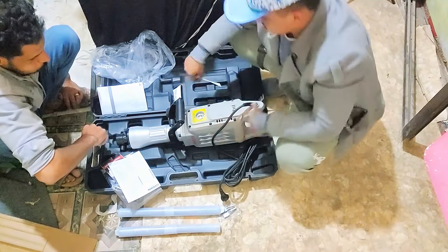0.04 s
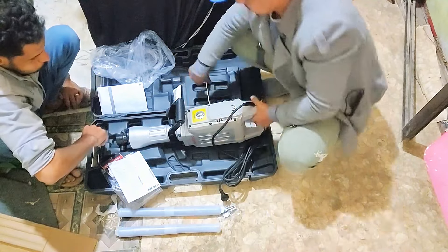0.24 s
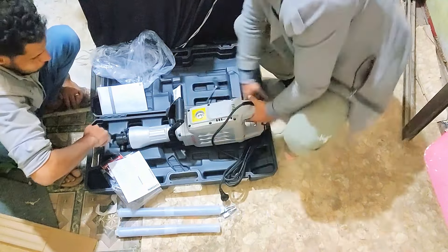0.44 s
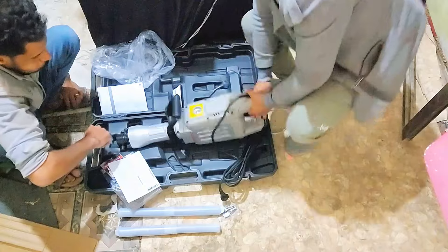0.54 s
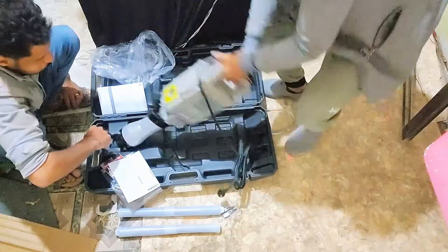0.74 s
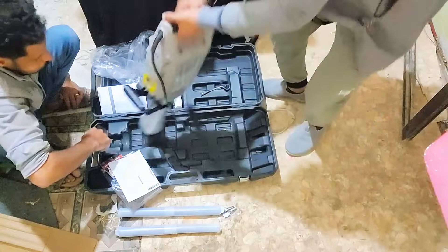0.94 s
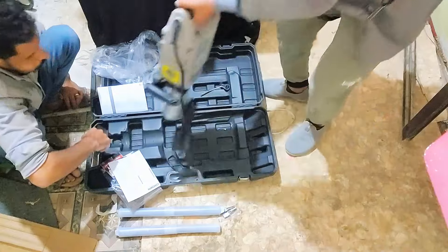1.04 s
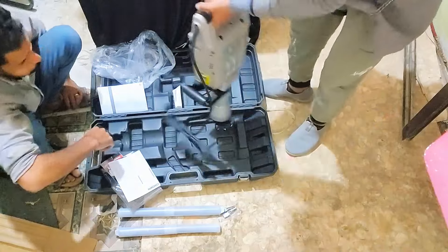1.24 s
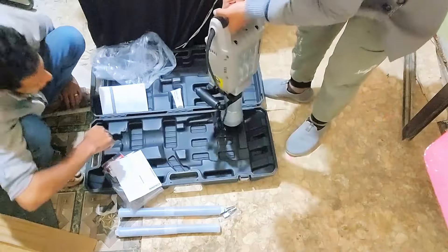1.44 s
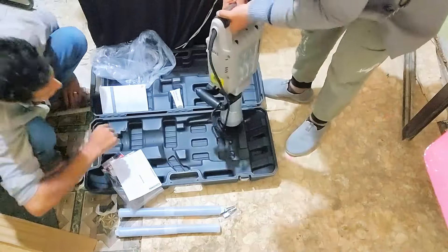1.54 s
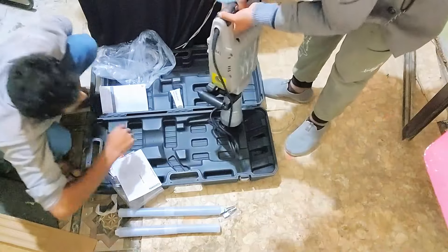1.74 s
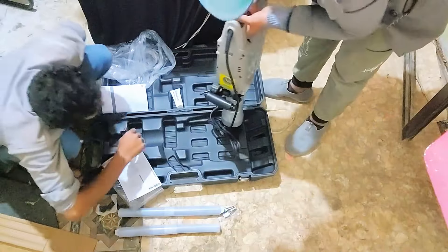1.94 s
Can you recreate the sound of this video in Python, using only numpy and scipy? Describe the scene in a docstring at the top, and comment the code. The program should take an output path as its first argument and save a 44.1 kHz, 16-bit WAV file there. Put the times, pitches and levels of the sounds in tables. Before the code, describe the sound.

A heavy tool knocks and scrapes in a hard plastic case. Hollow knocks come at about 0.25 seconds, followed by dragging, small clacks and faint squeaks until 0.8. A strong thump with a bright steel clink lands at 0.9, and another bump just after. At 1.35 the tool is set down with a sharp clack, rattling and scraping until about 1.6. A small room echoes briefly over a faint rumble.

```python
"""A faint hiss, then thumps, clacks and scrapes of a moulded plastic case: a heavy demolition hammer is
dragged out of it, lifted, and stood back on its nose in it. Blows ring the panels and shell; sliding is a
stream of tiny slips with stick-slip squeaks. Hard edges snap past each other; loose steel on the tool
clinks and rattles. A small hard room answers, over a low rumble."""
import sys
import numpy as np
from scipy import signal
from scipy.fft import rfft, irfft, next_fast_len
from scipy.io import wavfile

SR = 44100
rng = np.random.default_rng(int(sys.argv[2]) if len(sys.argv) > 2 else 0)


def master_out(mix):
    """Clip the mix to full scale and print it as 16-bit PCM to the path in sys.argv[1]."""
    frames = np.transpose(np.atleast_2d(mix))
    ceiling = np.clip(frames, -1, 1)
    pcm = np.round(ceiling * 32767).astype(np.int16)
    wavfile.write(sys.argv[1], SR, pcm)


N = 88200
T = np.arange(18000) / SR  # time within one event, s
MID_SIDE = np.array([[1], [.65]])  # gains
CRACK_RISE_S = .0007


def amp(db):
    """Decibels to gain."""
    return 10 ** (np.asarray(db) / 20)


def unit(x):
    """Scales to rms 1."""
    return x / np.sqrt(np.mean(x ** 2) + 1e-20)


def read(points, hz):
    """Interpolates a table on a log-frequency axis."""
    f, value = np.transpose(points)
    return np.interp(np.log(hz + 1), np.log(f), value)


def colour(x, points):
    """Filters by rows of Hz, gain in dB."""
    n = x.shape[-1]
    size = next_fast_len(n + 2048)
    gain = amp(read(points, np.fft.rfftfreq(size, 1 / SR)))
    return irfft(rfft(x, size) * gain, size)[..., :n]


def add(mix, start_s, sound):
    """Mixes a sound in at start_s."""
    part = mix[..., max(round(start_s * SR), 0):][..., :sound.shape[-1]]
    part += sound[..., :part.shape[-1]]


def strike(rise_s, t60_s, hold_s=0):
    """Envelope of a blow, peak 1; the decay begins after hold_s."""
    envelope = (1 - np.exp(-T / max(rise_s, 1e-5))) * amp(-60 * np.maximum(T - hold_s, 0) / t60_s)
    return envelope / envelope.max()


def sine(hz):
    """Sine of rms 1."""
    return np.sqrt(2) * np.sin(2 * np.pi * hz * T)


def dense_modes(spectrum):
    """Countless close modes as coloured noise; mid and side."""
    return unit(colour(rng.standard_normal((2, len(T))), spectrum)) * MID_SIDE


def flutter(hz):
    """Complex random wavering, low-passed at hz, rms 1; mid and side."""
    z = rng.standard_normal((2, len(T))) + 1j * rng.standard_normal((2, len(T)))
    z = np.fft.ifft(np.fft.fft(z) / (1 + (np.fft.fftfreq(len(T), 1 / SR) / hz) ** 2))
    return z / np.sqrt(np.mean(abs(z) ** 2))


# Rumble spectrum. Each row: frequency in Hz, gain in dB.
RUMBLE_SPECTRUM = [(15, -7.5), (38, -0.5), (65, -12), (105, -7), (170, -19), (350, -24), (700, -35),
                   (2000, -49), (7000, -51), (9000, -58), (16000, -63)]


def rumble():
    """Steady low noise of the room."""
    return amp(-58.5) * unit(colour(rng.standard_normal((2, N)), RUMBLE_SPECTRUM))


# Room decay. Each row: frequency in Hz, t60 in seconds.
ROOM_DECAY = [(80, 0.29), (250, 0.39), (700, 0.41), (2000, 0.34), (5000, 0.19), (15000, 0.27)]
# Echo spectrum. Each row: frequency in Hz, gain in dB.
ECHO_SPECTRUM = [(80, -9.5), (250, -14), (600, -9), (2000, -11.5), (5000, -11), (15000, -8.5)]


def room_echo(source, early_db=7):
    """Quick echoes from floor and furniture, then a short diffuse tail."""
    taps = rng.standard_normal((2, SR)) * (rng.random((2, SR)) < 3000 / SR)
    taps *= np.arange(SR) > .004 * SR
    hz, t, bands = signal.stft(taps, SR, nperseg=256)
    t60_s = read(ROOM_DECAY, hz)[:, None]
    decaying = bands * amp(-60 * t / t60_s) / np.sqrt(t60_s)
    tail = signal.istft(decaying, SR, nperseg=256)[1][:, :len(T)]
    early = rng.standard_normal((2, len(T))) * (rng.random((2, len(T))) < 900 / SR)
    early *= strike(rise_s=.001, t60_s=.082)
    response = tail / np.linalg.norm(tail[0]) + amp(early_db) * early / np.linalg.norm(early[0])
    return signal.fftconvolve(source[:1], colour(response, ECHO_SPECTRUM), axes=1)[:, :N]


# Steel clinks. Each row: start in seconds, ring in dB, jingle in dB, rise and chatter in seconds.
STEEL_CLINKS = [(.817, -56, -67, .012, .03), (.910, -29, -42.5, .006, .022), (.96, -52, -50, .004, .005),
                (1.036, -51, -55, .005, .04), (1.353, -49, -49, .004, .015), (1.372, -43, -50, .005, .028),
                (1.42, -54, -55, .005, .04), (1.475, -45, -53, .008, .033)]
# Steel modes. Each row: frequency in Hz, dB with the tool hanging, dB with it standing, t60 in seconds.
STEEL_MODES = [(5280, -30, -12, .11), (5852, -1, 1, .085), (6250, -24, -9, .1), (7502, 1, 0, .07),
               (9212, -15, -19, .13), (9360, -23, -14, .1), (10510, -22, -18, .12), (12030, -29, -12, .11),
               (12480, -23, -22, .11), (14384, -10, -15, .16), (14950, -15, -13, .12),
               (15410, -21, -10, .12)]
# Jingle spectrum. Each row: frequency in Hz, gain in dB.
JINGLE_SPECTRUM = [(2500, -25), (4500, 0), (6000, -3), (6800, -12), (7600, -2), (9400, -7), (10000, -17),
                   (11000, -6), (15000, -5)]


def steel_clinks(stands_at_s=1.343, rattle_depth=.5, rattle_hz=70):
    """Loose steel chatters into a high ring; standing the tool up shifts the balance of its modes."""
    out = np.zeros((2, N))
    for start_s, ring_db, jingle_db, rise_s, chatter_s in STEEL_CLINKS:
        clink = amp(jingle_db) * dense_modes(JINGLE_SPECTRUM)
        clink *= strike(rise_s, t60_s=.09, hold_s=chatter_s)
        for hz, hanging_db, standing_db, t60_s in STEEL_MODES:
            rattle = 1 + rattle_depth * flutter(rattle_hz)
            tone = (rattle * np.exp(2j * np.pi * (hz * T + rng.random((2, 1))))).real
            db = ring_db + (hanging_db if start_s < stands_at_s else standing_db)
            clink += amp(db) * tone * strike(rise_s, t60_s, chatter_s) * MID_SIDE
        add(out, start_s, clink)
    return out


# Squeaks. Each row: start and length in seconds, pitch and bandwidth in Hz, level in dB.
SLIP_SQUEAKS = [(0.243, 0.06, 4405, 593, -50), (0.279, 0.04, 2134, 400, -37.5),
                (0.34, 0.047, 3110, 120, -55.5), (0.342, 0.048, 3930, 700, -57.5),
                (0.44, 0.061, 2278, 302, -47.5), (0.502, 0.026, 3165, 305, -55.5),
                (0.611, 0.04, 7190, 740, -50), (1.357, 0.18, 4670, 60, -51.5)]


def slip_squeaks():
    """Sliding parts stick and slip, singing briefly at one unsteady pitch."""
    out = np.zeros((2, N))
    for start_s, length_s, hz, width_hz, db in SLIP_SQUEAKS:
        tone = unit((flutter(width_hz / 2) * np.exp(2j * np.pi * hz * T)).real)
        swell = np.sin(np.pi * np.minimum(T / length_s, 1))
        add(out, start_s, amp(db) * tone * swell * MID_SIDE)
    return out


# Snaps. Each row: start in seconds, level in dB, pitch in Hz, t60 in seconds.
EDGE_SNAPS = [(.074, -55, 7500, .004), (.443, -45, 5100, .008), (.550, -54, 7000, .005),
              (.7195, -34, 2400, .013), (.720, -37, 3420, .009), (.738, -42, 2250, .018),
              (1.033, -33, 3130, .025), (1.3435, -22, 2150, .014), (1.344, -29, 2850, .011)]


def edge_snaps(roughness=.9):
    """A hard edge lets go and rings for an instant at one rough pitch."""
    out = np.zeros((2, N))
    mid_only = np.array([[1], [0]])
    for start_s, db, hz, t60_s in EDGE_SNAPS:
        tone = ((mid_only + roughness * flutter(hz=800)) * np.exp(2j * np.pi * hz * T)).real
        add(out, start_s, amp(db) * tone * strike(CRACK_RISE_S, t60_s))
    return out


# Low, middle and high spectra; knocks share clack and crack. Each row: frequency in Hz, gain in dB.
GROAN_SPECTRUM = [(60, -24.5), (120, -7.5), (220, -2.5), (340, -8), (500, -20), (700, -16.5), (2000, -67.5)]
CLACK_SPECTRUM = [(150, -28), (400, 3.5), (650, -5.5), (900, -5.5), (1300, -4), (2200, -16), (3000, -26.5),
                  (5000, -39.5), (9000, -59.5)]
CRACK_SPECTRUM = [(800, -23), (1800, -4.5), (2500, -7), (3200, -2.5), (4200, -9), (6000, -10.5),
                  (8000, -15.5), (11000, -27.5), (15500, -32)]
# First row is faint background hiss and low noise; the rest are the tool sliding on plastic.
# Each row: start and length in seconds, groan, clack and crack in dB.
HISS_AND_SCRAPES = [(.0, 0.33, -65.5, -91, -71), (0.245, 0.14, -33, -37, -57),
                    (0.316, 0.25, -41, -66.5, -65.5), (0.439, 0.076, -36.5, -45.5, -62),
                    (0.484, 0.16, -46.5, -59, -61.5), (0.598, 0.027, -41, -39, -49),
                    (0.623, 0.063, -47, -47, -61), (0.689, 0.13, -46, -76.5, -63.5),
                    (0.888, 0.11, -34.5, -51, -41.5), (0.922, 0.057, -41.5, -37, -45),
                    (0.986, 0.19, -48, -52, -55.5), (1.046, 0.049, -30, -59.5, -81),
                    (1.186, 0.51, -51, -62, -67), (1.353, 0.14, -27, -44.5, -49.5),
                    (1.461, 0.16, -35.5, -47, -75)]


def hiss_and_scrapes(clicks_per_s=2600, spread_db=3):
    """Swells of dense clicks: faint background noise first, then the tool's tiny slips on the plastic."""
    out = np.zeros((2, N))
    spectra = GROAN_SPECTRUM, CLACK_SPECTRUM, CRACK_SPECTRUM
    for start_s, length_s, *levels_db in HISS_AND_SCRAPES:
        onsets = rng.random(len(T)) < clicks_per_s / SR
        strength = amp(spread_db * np.minimum(rng.exponential(1, len(T)), 3))
        clicks = onsets * strength * rng.choice([-1., 1.], (2, len(T)))
        noise = sum(amp(db) * unit(colour(clicks, spectrum)) for db, spectrum in zip(levels_db, spectra))
        swell = np.sin(np.pi * np.minimum(T / length_s, 1) ** .55)  # peaks early
        add(out, start_s, noise * swell * MID_SIDE)
    return out


# Case modes. Each row: frequency in Hz, level in dB, t60 in seconds.
CASE_MODES = [(102.3, -17.5, 0.4), (163, -16, 0.15), (188.1, -14, .22), (237.2, -13.5, 0.29),
              (303.5, -15.5, 0.13), (356.5, -13, 0.046), (420.3, -17, 0.085), (478.6, -18.5, 0.15),
              (680, -26, 0.12), (880, -24.5, 0.17)]
# Case radiation, weak in the deep bass. Each row: frequency in Hz, gain in dB.
CASE_RADIATION = [(40, -24.5), (80, -4), (115, 1), (16000, -5.5)]
# Tool against case. Each row: start in seconds, thump in dB and Hz, panel in dB and Hz,
# panel t60 in seconds, clack in dB and Hz, crack in dB.
CASE_KNOCKS = [(.230, -33, 145.6, -23, 319.4, 0.066, -30.5, 1686, -47.5),
               (.256, -40, 110, -20.5, 326.6, 0.14, -39.5, 1540, -41.5),
               (.276, -24, 193, -13.5, 317, 0.056, -35.5, 1550, -41),
               (0.298, -40.5, 113.5, -33.5, 274.5, .15, -41, 2050, -54),
               (.428, -41, 147.7, -25, 367, 0.116, -37, 1594, -44.5),
               (.442, -52, 241, -23.5, 360, 0.1, -34, 1630, -50.5),
               (.524, -33.5, 103.6, -50.5, 338.6, 0.081, -65, 1380, -67.5),
               (.613, -43, 130.2, -20, 252, .04, -27.5, 1460, -49),
               (.617, -41.5, 144.6, -20, 340, 0.028, -28, 1458, -44),
               (.720, -36.5, 194.3, -26, 346.6, .05, -38, 1630, -54),
               (.742, -36, 153, -27.5, 361.3, 0.087, -44.5, 2170, -59),
               (0.812, -53.5, 171, -31.5, 492, 0.034, -50.5, 1940, -46),
               (0.838, -46, 172, -28, 471, 0.02, -47, 1026, -47),
               (.910, -21, 177, -18.5, 477, 0.025, -30, 2324, -24),
               (.916, -17.5, 166.9, -22.5, 520, 0.063, -33.5, 1360, -49),
               (.952, -25, 188, -24.5, 446.3, 0.055, -37, 950, -48.5),
               (1.031, -36, 177.2, -29.5, 400.5, 0.025, -35.5, 1590, -33),
               (1.038, -22, 172.7, -23, 334, 0.019, -26, 825, -40.5),
               (1.343, -34.5, 202, -12.5, 342, 0.026, -17.5, 1177, -49),
               (1.352, -36.5, 139, -17.5, 238, 0.052, -32, 1087, -35.5),
               (1.377, -28, 180, -23.5, 264.5, 0.074, -39.5, 844, -54),
               (1.399, -35.5, 105.4, -37, 235, 0.072, -42.5, 824, -56),
               (1.426, -56.5, 183.5, -26.5, 416.3, 0.068, -36.5, 771, -61.5),
               (1.477, -48.5, 167, -40, 351, 0.077, -42, 877, -41.5),
               (1.517, -54.5, 177, -30.5, 367, 0.034, -43, 860, -50),
               (1.541, -38.5, 223.7, -28, 367.3, 0.049, -51.5, 715, -68)]


def case_knocks(thump_rise_s=.018, panel_rise_s=.003, shell_db=-3, ring_db=-7.5):
    """Each blow thumps the hollow case, bends one panel, and sets the shell clacking and ringing."""
    out = np.zeros((2, N))
    ring = sum(amp(db) * sine(hz) * strike(panel_rise_s, t60_s) for hz, db, t60_s in CASE_MODES)
    chatter = amp(-11) * strike(thump_rise_s, t60_s=.06)  # the shell buzzes on after a blow
    clack_envelope = strike(rise_s=.001, t60_s=.05) + chatter
    crack_envelope = strike(CRACK_RISE_S, t60_s=.024) + chatter
    for (start_s, thump_db, thump_hz, panel_db, panel_hz, panel_t60_s,
         clack_db, clack_hz, crack_db) in CASE_KNOCKS:
        blow = amp(clack_db + shell_db) * dense_modes(CLACK_SPECTRUM) * clack_envelope
        blow += amp(crack_db) * dense_modes(CRACK_SPECTRUM) * crack_envelope
        struck_spot = amp(clack_db) * sine(clack_hz) * strike(CRACK_RISE_S, t60_s=.022)
        thump = amp(thump_db) * sine(thump_hz) * strike(thump_rise_s, t60_s=.047)
        panel = sine(panel_hz) * strike(panel_rise_s, panel_t60_s)
        blow[0] += struck_spot + thump + amp(panel_db) * (panel + amp(ring_db) * ring)
        add(out, start_s, blow)
    return colour(out, CASE_RADIATION)


# Stereo width. Each row: frequency in Hz, linear side gain.
SIDE_GAIN = [(60, .22), (200, .21), (380, .33), (600, 1.15), (2000, .95), (5000, .65), (15000, .8)]
# Stereo balance. Each row: frequency in Hz, left over right in dB.
BALANCE = [(60, 0), (170, .1), (380, 2.4), (700, 1.4), (1290, .7), (2380, -1.9), (4400, -2), (8000, .3),
           (15000, 0)]


def scene():
    """Opening hiss, handling noise and their echo over the rumble; left and right, bass near mono."""
    direct = case_knocks() + hiss_and_scrapes() + slip_squeaks() + edge_snaps() + steel_clinks()
    direct *= amp(-2.5)
    mid, side = rfft(rumble() + room_echo(direct) + direct)
    hz = np.fft.rfftfreq(N, 1 / SR)
    side *= read(SIDE_GAIN, hz)
    lean = amp(read(BALANCE, hz) / 2)
    return irfft(np.array([(mid + side) * lean, (mid - side) / lean]), N)


# Treble notch. Each row: frequency in Hz, gain in dB.
TREBLE_NOTCH = [(20, 0), (7900, 0), (8500, -17), (9100, 0), (16000, 0)]


def record(dry):
    """A narrow dip at 8.5 kHz, then a low-pass at 15.9 kHz."""
    lowpass = signal.firwin(401, 15900, window=("kaiser", 9), fs=SR)
    return signal.oaconvolve(colour(dry, TREBLE_NOTCH), lowpass[None], "same")


dry = scene()
out = record(dry)
master_out(out)
```